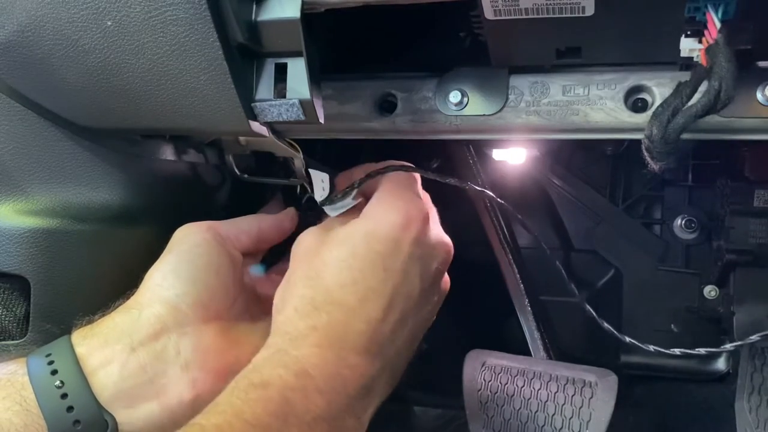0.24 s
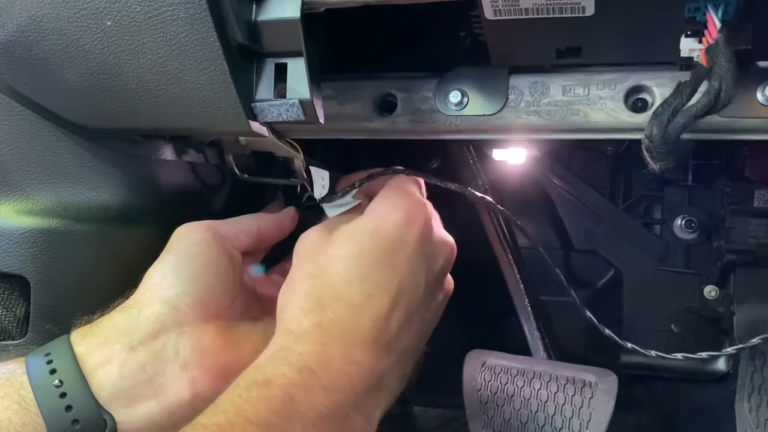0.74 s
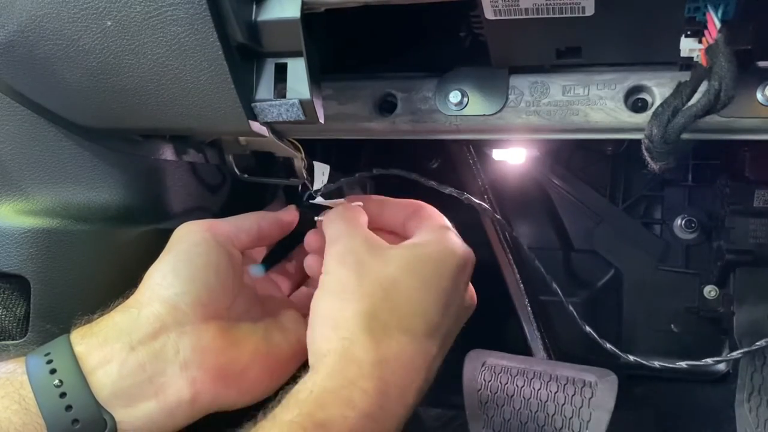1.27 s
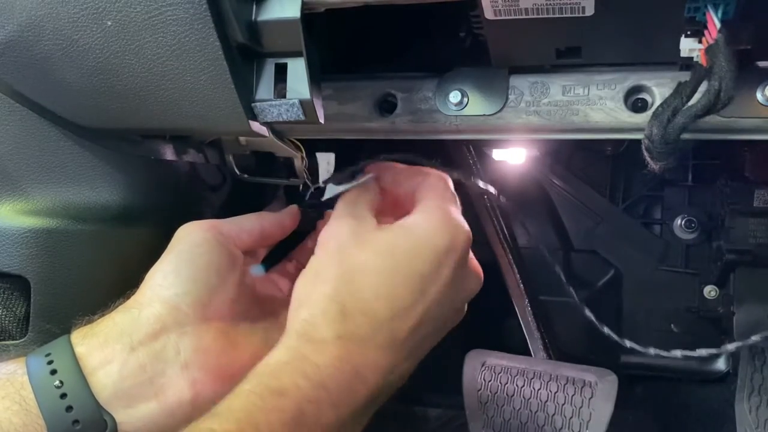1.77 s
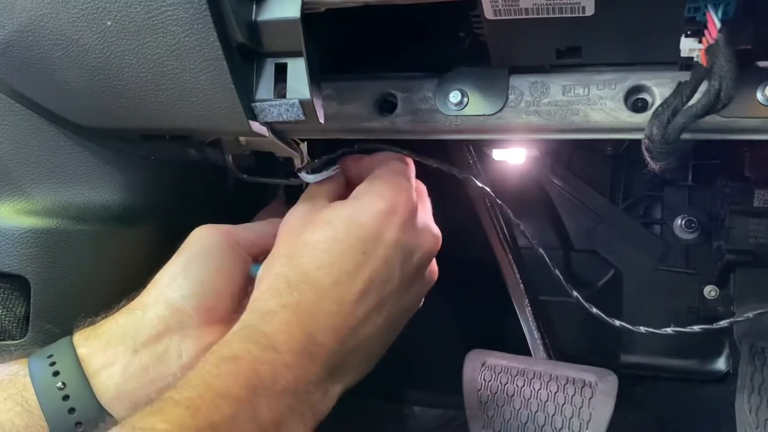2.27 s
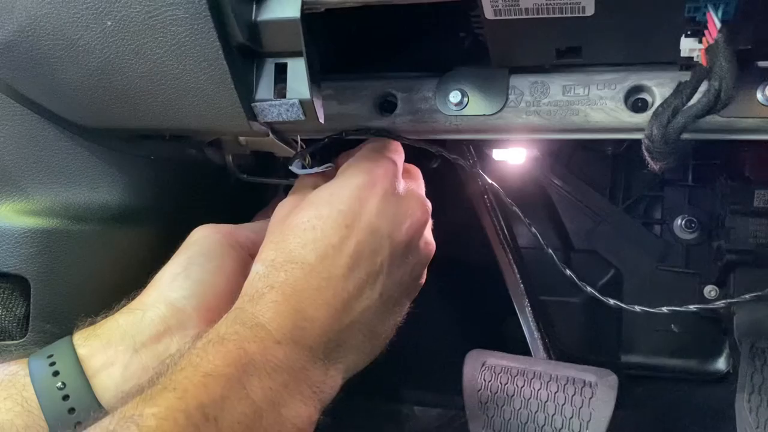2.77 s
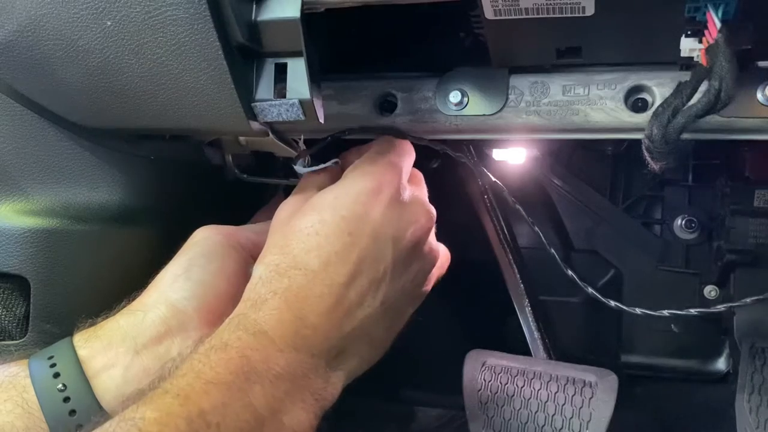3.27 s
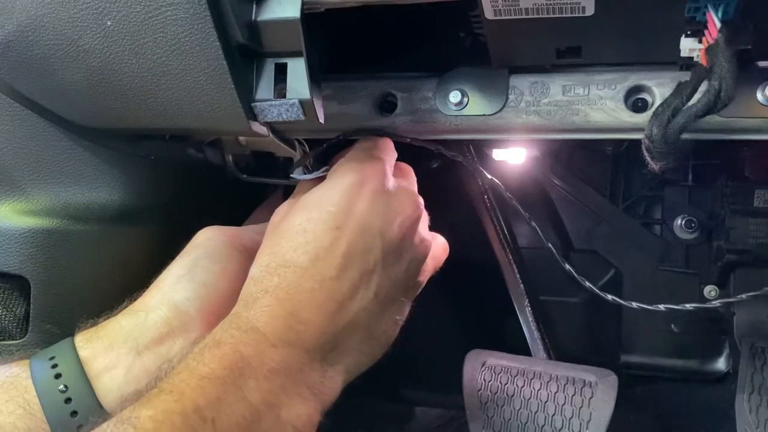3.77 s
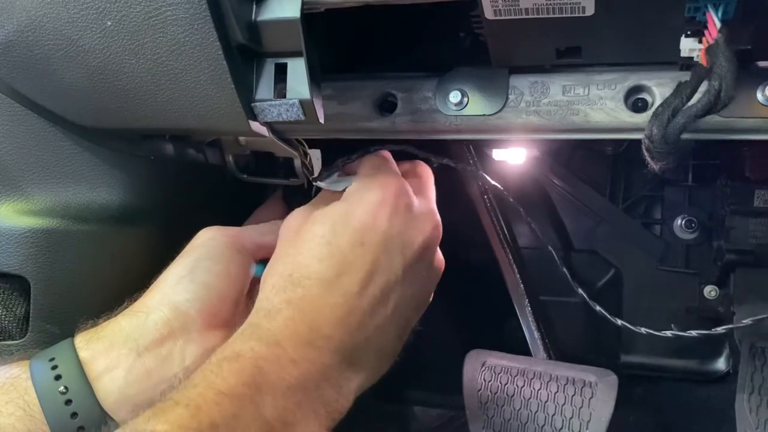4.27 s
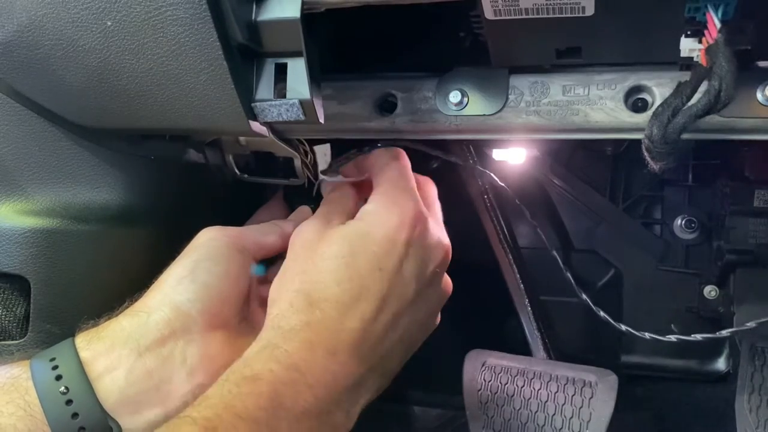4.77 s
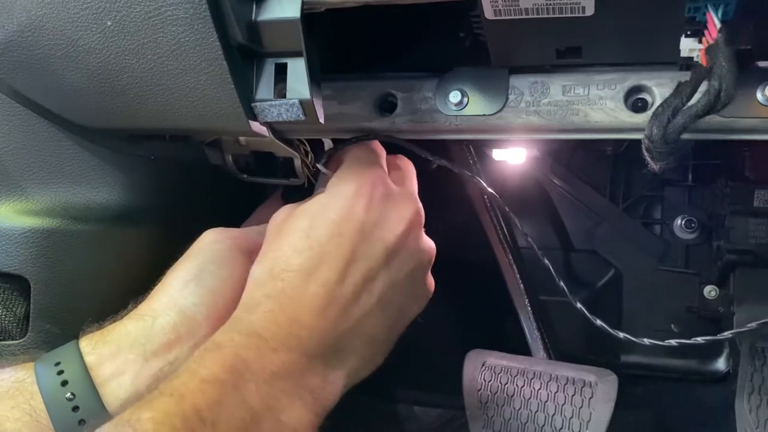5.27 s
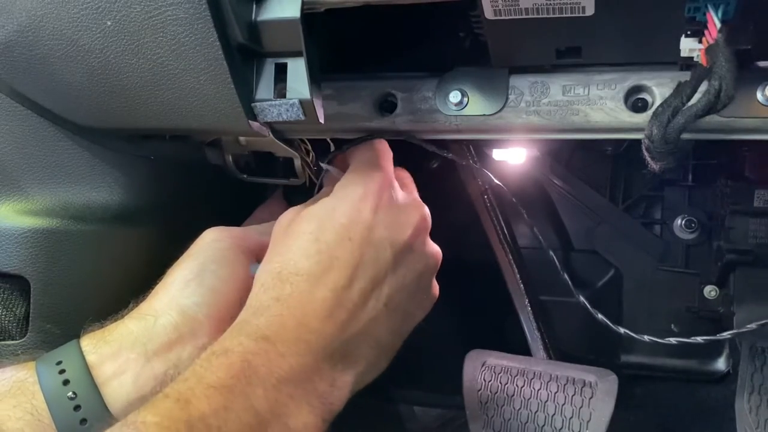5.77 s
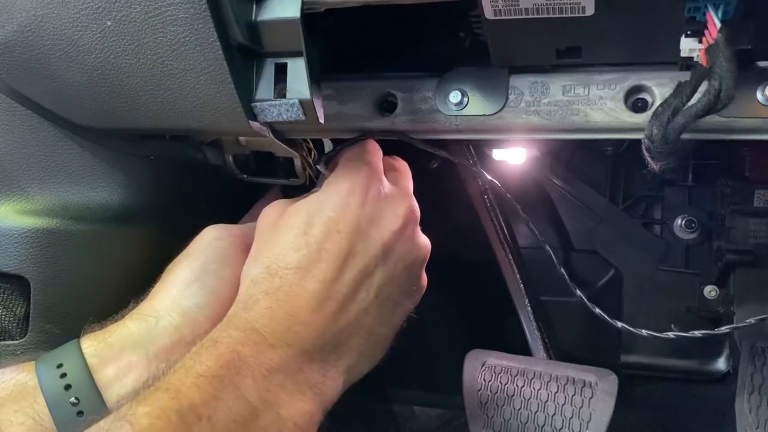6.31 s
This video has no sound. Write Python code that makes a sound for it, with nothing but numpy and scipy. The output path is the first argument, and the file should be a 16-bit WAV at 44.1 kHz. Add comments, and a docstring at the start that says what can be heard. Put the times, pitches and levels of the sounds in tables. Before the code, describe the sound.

Inside a quiet parked car, close stereo microphones catch hands working a plastic wiring connector beneath the dashboard. Soft skin rubbing and small wire scrapes mix with scattered dry clicks, some knocking dully on the trim. Activity thickens after four seconds, and near six a bright locking tab snaps loudly with a tiny chatter. A weak, wavering low hum, rumble and thin hiss lie underneath; a small bird chips faintly outside.

```python
"""Parked car, under the dashboard: close to a stereo pair, hands work a plastic wiring connector.
It clicks, its locking tab chatters and wires scrape: grainy contact forces ring edges, housing, clips and trim.
Fingers rub the insulation as shaped noise with crackle. A wavering low tone, rumble and hiss fill the cabin.
Outside, a small bird chips and faint far whistles glide: swept tones heard through dense echoes."""
import sys
import numpy as np
from scipy import signal
from scipy.fft import rfft, irfft, next_fast_len
from scipy.io import wavfile
from scipy.ndimage import uniform_filter1d, map_coordinates

SR = 44100
rng = np.random.default_rng(int(sys.argv[2]) if len(sys.argv) > 2 else 0)


def digitize_waveform(pressure):
    """Quantize a signal to 16-bit integers and store it at the path in sys.argv[1].

    Rows of a 2-D input are taken as channels; values are limited to [-1, 1].
    """
    field = np.atleast_2d(pressure).T
    bounded = np.clip(field, -1, 1)
    quanta = np.round(bounded * 32767).astype(np.int16)
    wavfile.write(sys.argv[1], SR, quanta)


N = 288414

# Levels in the tables are in dB; some sources add a gain of their own.
# steady hiss spectrum: [f/Hz, level/dB]
AIR = [(290, -19), (500, -15), (640, -1.5), (780, -2.5), (950, -4), (1300, -8.5), (2300, -10.5),
       (3000, -13), (4000, -14), (4650, -5), (5400, -8), (6300, -2), (7050, 2.5), (7700, -14.5),
       (8500, -35), (9800, -16), (12000, -33.5), (14100, -28.5), (16000, -44)]
# left-right likeness of the diffuse sounds: [f/Hz, correlation]
AIR_ALIKE = [(60, 0.95), (125, 0.88), (250, 0.76), (600, 0), (2000, 0.14), (7000, 0.19)]
# cabin rumble spectrum: [f/Hz, level/dB]
RUMBLE = [(15, -26.5), (28, -17.5), (45, -7), (59, 4), (69, 0.5), (90, -1.5), (106, 3), (125, -2),
          (150, -17), (250, -21.5), (450, -30.5), (900, -48), (2000, -63.5)]
# course of the hum: [t/s, level/dB]
HUM = [(0.0, -40), (0.05, -46), (0.73, -44.5), (1.15, -72.5), (1.2, -55.5), (2.07, -46), (2.13, -49),
       (3.13, -49.5), (3.3, -65), (4.02, -43.5), (4.77, -49), (4.83, -59), (5.14, -46), (5.19, -55.5),
       (5.3, -48), (5.45, -59), (5.59, -47.5), (5.68, -55.5), (5.74, -47.5), (5.85, -53.5), (6.28, -45),
       (6.54, -46)]
# bird chips: [t/s, level/dB, base pitch f/Hz]
CHIPS = [(0.176, -62, 6460), (.239, -52.5, 6680), (1.583, -57, 6860), (2.687, -52.5, 6480),
         (4.873, -51.5, 6800), (5.134, -68, 6780), (5.406, -67, 6850), (5.762, -67, 6830),
         (6.182, -69.5, 6550)]
# faint far whistles: [t/s, length/s, start f/Hz, end f/Hz, level/dB]
WHISTLES = [(1.333, .05, 2440, 2170, -73.5), (2.223, 0.062, 3270, 2570, -79),
            (2.787, 0.15, 3570, 3610, -78.5), (2.822, 0.081, 4670, 4760, -83),
            (2.853, .057, 3250, 2710, -83.5), (2.955, 0.063, 3730, 4280, -83.5),
            (2.998, .067, 2230, 2510, -87)]
# fingers rubbing along the insulation: [start t/s, length/s, skin level/dB, crackle level/dB]
RUBS = [(-.06, 0.39, -79, -102), (0.32, 0.44, -83.5, -100), (1.833, 0.22, -86.5, -83),
        (2.896, 0.3, -103, -96), (3.657, .6, -98, -99), (4.472, 0.17, -75.5, -72.5),
        (4.678, 0.51, -89.5, -95.5), (5.204, 0.24, -80.5, -100), (5.408, 0.26, -77, -75),
        (5.65, 0.34, -79, -95), (5.962, 0.64, -80, -101.5)]
# skin on insulation, spectrum: [f/Hz, level/dB]
SKIN = [(200, -5.5), (400, -3), (750, -5.5), (1000, -2), (1200, -1.5), (1520, 1.5), (1900, -10.5),
        (2300, -7), (3000, -17), (8000, -35.5)]
# air resonances of the footwell: [f/Hz, width/Hz, level/dB]
CABIN = [(150.6, 26, -1.5), (237.7, 32, 5.5), (352, 64, -2.5)]
# resonances of the dashboard trim: [f/Hz, width/Hz, level/dB]
TRIM = [(474, 90, -27.5), (658, 143, 8), (840, 49, 9), (989, 186, 11.5), (1315, 140, -27.5),
        (1420, 170, -22.5), (1903, 380, -7)]
# resonances of the wire clips: [f/Hz, width/Hz, level/dB]
CLACK = [(1527, 1800, -11.5), (2310, 130, 1.5), (2650, 510, -13.5), (3410, 1100, -7.5)]
# connector housing, spectrum: [f/Hz, level/dB]
SHELL = [(1500, -32), (3300, -18.5), (4000, -5.5), (4600, 0), (5150, -3), (5700, -0.5), (6200, 0.5),
         (7000, 0.5), (8000, -6), (9500, -31.5)]
# resonances of the housing's thin edges: [f/Hz, width/Hz, level/dB]
SNAP = [(9350, 510, 0), (10460, 140, -3), (10150, 440, -1.5), (11900, 900, -12.5), (12700, 100, -10.5),
        (13850, 340, -14.5), (13100, 240, -2.5), (15300, 750, -1), (14100, 160, -4.5)]
# short slides of wire and fingers:
# [t/s, plastic level/dB, brightness/dB, trim knock level/dB, knock tilt/(dB per octave), early t60/s]
SCRAPES = [(1.0078, -88, 9, -77, -1, 0.039), (2.266, -84.5, -6, -77.5, 3, 0.048),
           (2.9554, -73.5, 12.5, -73, -3, 0.038), (3.1185, -75, 6.5, -76.5, -7, .07),
           (3.3174, -80.5, 16, -70, 5, 0.035), (4.5328, -68, 14, -69, -2, 0.096),
           (4.7225, -79, -1, -65, -7, 0.085), (4.8635, -89, 24, -72, 2, .07),
           (4.9947, -87, -4, -76.5, 6, 0.07), (5.0904, -64.5, 7.5, -65, 3, .17),
           (5.3024, -78.5, -5, -84, 13, 0.05), (5.3204, -78.5, -12, -75.5, 13, 0.033),
           (5.65, -72, 2, -65.5, -5, .14), (5.7634, -75, 7, -75.5, 0, 0.12),
           (6.4076, -78.5, 4.5, -77.5, -2, 0.45), (6.5046, -59.5, 9, -55, -4.5, 0.31),
           (6.5324, -63, 1, -59.5, -9.5, 0.061)]
# sharp contacts of the connector, same columns:
# [t/s, plastic level/dB, brightness/dB, trim knock level/dB, knock tilt/(dB per octave), early t60/s]
CLICKS = [(1.731, -66, 19.5, -87, 0, 0.027), (2.029, -60.5, 8.5, -60.5, 10, .034),
          (3.07, -71.5, 11, -67, -5, 0.081), (3.18, -78.5, 24, -68.5, 4.5, .07),
          (3.548, -61.5, 20.5, -48, -3.5, .06), (3.8478, -64.5, 34.5, -79, 2, 0.025),
          (4.3175, -63.5, 22.5, -54, 3, 0.03), (4.326, -59.5, 15.5, -60.5, 3.5, 0.07),
          (4.615, -83.5, 25, -68.5, -5, 0.063), (4.703, -80, -19.5, -64.5, -6, 0.061),
          (5.0744, -66.5, 35, -57.5, 3.5, 0.069), (5.1303, -58.5, -1.5, -67.5, 8, 0.023),
          (5.469, -61.5, 0.5, -65.5, -3, 0.014), (5.5445, -63, 5, -62.5, 0, 0.069),
          (5.9545, -47, 19, -57.5, 0, 0.073), (6.099, -83.5, -8, -77, 16, .02)]
# the locking tab jumps its catch and chatters: [t/s, level/dB]
LOCK = [(5.9552, -27.5), (5.9568, -31), (5.9584, -35)]
# modes of the tab: [f/Hz, level/dB, t60/s]
TAB = [(4626, -12, .035), (5170, -15, .03), (5660, -15, .028), (6170, -12, .032), (9540, -6, .026),
       (10210, -6, .026), (10900, -11, .02), (12690, -8, .02), (12950, -4, .024), (13340, -4, .022),
       (13600, 1, .026), (13970, -3, .026), (14180, -4, .024), (14535, -5, .024), (15000, -13, .024)]

TOP_HZ = 15900  # upper band limit of the recorder
HUM_HZ, DRIFT_HZ, DRIFT_PER_S = 108.03, 1.192, 6  # the hum wanders about one pitch
FULL_DB, SAG_HZ_PER_DB = -45, 0.25  # its pitch is lower when it falls below full level
FLUTTER_DB, FLUTTER_PER_S = 1.88, 23
# level and late echo of a near chip; fainter ones are farther and echo more (dB per dB)
NEAR_DB, NEAR_ECHO_DB, ECHO_SLOPE = -52, -18, 1.4
OVERTONE_DB, DULLING = -15, 0.7  # octave of a near chip; distance dulls it (dB per dB)
RUB_ATTACK_S, RUB_RELEASE_S = 0.0418, 0.15
HOLD_SKIN_DB, HOLD_CRACKLE_DB = -94, -104  # fingers that merely hold the wires
# a brighter contact rings the thin edges more and the wire clips less (dB per dB)
SNAP_SLOPE, CLACK_SLOPE = 0.54, 0.64


def amp(db):
    """Decibels to gain."""
    return 10 ** (np.asarray(db) / 20)


def unit(x):
    """Scale to rms 1."""
    return x / np.sqrt(np.mean(x ** 2) + 1e-20)


def along(points, hz):
    """Read (Hz, value) points on a log frequency axis."""
    f, v = np.transpose(points)
    return np.interp(np.log(hz + 1), np.log(f + 1), v)


def curves(rows):
    """One value per sample for each column after the time."""
    s, *cols = np.transpose(rows)
    return [np.interp(np.arange(N) / SR, s, c) for c in cols]


def wobble(rate, n):
    """A smooth random curve of n samples, rate knots a second."""
    knots = rng.standard_normal(int(n * rate / SR) + 4)
    return map_coordinates(knots, [np.arange(n) * rate / SR])


def filtered(x, response):
    """Apply a complex response of frequency to x."""
    n = x.shape[-1]
    m = next_fast_len(n + 8192)
    return irfft(rfft(x, m) * response(np.fft.rfftfreq(m, 1 / SR)), m)[..., :n]


def colour(points):
    """Response of a (Hz, dB) spectrum."""
    return lambda f: amp(along(points, f))


def body(modes):
    """Causal response of a set of resonances, alternating in sign."""
    def response(f):
        total = 0
        for k, (centre, width, db) in enumerate(modes):
            damping = 1j * f * width
            total = total + (-1) ** k * amp(db) * damping / (centre * centre - f * f + damping)
        return total
    return response


def add(track, s, x):
    """Mix x into the track at time s."""
    i = max(round(s * SR), 0)
    track[..., i:i + x.shape[-1]] += x[..., :max(N - i, 0)]


def loudest(x, size):
    """Highest short-term rms over size samples, all channels together."""
    return np.sqrt(uniform_filter1d(np.mean(x ** 2, axis=0), size=size).max())


def ports(x, lead_ms, pan_db):
    """A near source reaches the left microphone earlier and louder; negative values favour the right."""
    side = np.array([[.5], [-.5]])
    return filtered(x, lambda f: amp(side * pan_db) * np.exp(2j * np.pi * f * side * lead_ms * 10 ** -3))


def diffuse(spectrum):
    """Stereo noise of rms 1, alike in the bass and nearly unrelated in the treble."""
    def mid_side(f):
        turn = np.arccos(np.clip(along(AIR_ALIKE, f), -1, 1)) / 2
        return colour(spectrum)(f) * np.array([np.cos(turn), np.sin(turn)])
    mid, side = filtered(rng.standard_normal((2, N)), mid_side)
    return unit(np.array([mid + side, mid - side]))


def hiss():
    """Steady thin air noise, spread across both microphones."""
    return amp(-78.5) * diffuse(AIR)


def hum():
    """A low tone swells, sags and flutters in the cabin; the rumble follows a quarter of its level in dB."""
    db, = curves(HUM)
    hz = HUM_HZ + SAG_HZ_PER_DB * (db - FULL_DB) + DRIFT_HZ * wobble(DRIFT_PER_S, N)
    flutter_db = FLUTTER_DB * wobble(FLUTTER_PER_S, N)
    tone = amp(db + flutter_db - 0.18) * unit(np.sin(2 * np.pi * np.cumsum(hz) / SR))
    rumble = amp(-58.0 + 0.25 * (db - db.mean())) * diffuse(RUMBLE)
    return (tone + rumble) * amp([[.25], [-.25]])  # slightly left


def hall(x, t60, late_db):
    """A far call arrives as dense echoes, different at each microphone; its loudest moment has rms 1."""
    t = np.arange(SR) / SR
    decay = amp(-60 * t / t60) + amp(late_db - 60 * t / 1.1)
    tail = rng.standard_normal((2, SR)) * decay
    wet = signal.fftconvolve(x[None], tail, axes=1)
    return wet / loudest(wet, 1024)


def whistles():
    """Far whistles glide and quaver, each with a weaker octave."""
    out = np.zeros((2, N))
    for s, length, start_hz, end_hz, db in WHISTLES:
        n = round(length * SR)
        glide = np.linspace(start_hz, end_hz, n) * (1 + 0.016 * wobble(200, n))
        phase = 2 * np.pi * np.cumsum(glide) / SR
        note = np.hanning(n) * (np.sin(phase) + amp(-9.0) * np.sin(2 * phase))
        add(out, s, amp(db) * hall(note, t60=.12, late_db=-20.5))
    return out


def chips():
    """Each bird chip flicks up and down in pitch with a fast flutter and a weak octave."""
    out = np.zeros((2, N))
    u = np.linspace(0, 1, round(.036 * SR))
    contour = np.interp(u, [0, .2, .45, .7, 1], [.82, 1.0, 1.07, 1.02, .81])
    swell = np.abs(np.sin(np.pi * u)) ** 0.56
    for s, db, hz in CHIPS:
        late_db = NEAR_ECHO_DB + ECHO_SLOPE * (NEAR_DB - db)
        flutter = 1 + .03 * wobble(500, len(u))
        phase = 2 * np.pi * np.cumsum(hz * contour * flutter) / SR
        octave_db = db + OVERTONE_DB + DULLING * (db - NEAR_DB)
        add(out, s, amp(db) * hall(swell * np.sin(phase), t60=.25, late_db=late_db))
        # the air swallows the echoes of the octave sooner
        add(out, s, amp(octave_db) * hall(swell ** 4 * np.sin(2 * phase), t60=.22, late_db=-40))
    return out


def rubbing():
    """Skin brushes the wires softly and unevenly while sparse random slips crackle in the insulation."""
    t = np.arange(N) / SR
    skin_gain, crackle_gain = amp(HOLD_SKIN_DB), amp(HOLD_CRACKLE_DB)
    for s, length, skin_db, crackle_db in RUBS:
        stroke = np.clip(np.minimum((t - s) / RUB_ATTACK_S, (s + length - t) / RUB_RELEASE_S), 0, 1)
        skin_gain = skin_gain + amp(skin_db) * stroke
        crackle_gain = crackle_gain + amp(crackle_db) * stroke
    happens = rng.random(N) < 2000 / SR  # about 2000 slips a second
    strength = amp(2.7 * rng.exponential(size=N).clip(0, 4))
    slips = happens * strength * rng.standard_normal((2, N))
    crackle = amp(-6.5) * crackle_gain * unit(filtered(slips, body(SNAP)))
    skin = skin_gain * diffuse(SKIN) * amp([[1], [-1]])  # a little to the left
    pressure = amp(2.4 * wobble(25, N))
    return pressure * (crackle + skin)


def ring(force, response, db, spread, blow=0):
    """A clean blow and a grainy force ring a part; nearby surfaces scatter it. db is its loudest moment."""
    grit = rng.standard_normal((3, len(force)))  # one shared grain, one for each side
    drive = force * (grit[0] + spread * grit[1:]) / np.linalg.norm(force)
    drive[:, 0] += blow
    x = filtered(drive, response)
    return amp(db) * x / loudest(x, 128)


def edges(f):
    """Thin edges ring high and lose their bass."""
    return body(SNAP)(f) * (1j * f / (5000 + 1j * f)) ** 2


def panel(f):
    """The trim resonates and loses its treble."""
    return body(TRIM)(f) / (1 + 1j * f / 2500) ** 2


def footwell(f):
    """The air behind the trim resonates low and loses its treble."""
    return body(CABIN)(f) / (1 + 1j * f / 500) ** 2


def contacts(rows, rise, blow, tail_db, slip_db, snap_db, shell_db, clack_db, knock_db, boom_db):
    """Each contact sounds edges and housing and, through the wires, the trim, which drives the air behind it."""
    snaps, plastic, trim, boom = np.zeros((4, 2, N))
    t = np.arange(SR // 5) / SR
    for s, level, bright, knock, tilt, t60 in rows:
        # each spot on the trim favours other modes
        spot = lambda f: panel(f) * amp(tilt * np.log2(np.clip(f, 400, 1600) / 800))
        # the force may slip unevenly as it dies; the footwell adds a short tail, longer in the bass
        push = (1 - np.exp(-t / rise)) * amp(slip_db * wobble(300, len(t)))
        force = push * (amp(-60 * t / t60) + amp(tail_db - 60 * t / 0.14))
        thud = push * (amp(-60 * t / (1.02 * t60)) + amp(-13.5 - 60 * t / 0.19))
        # the fingers detune the clips a little each time
        grip = 1 + .035 * rng.standard_normal()
        clips = lambda f: body(CLACK)(f * grip)
        add(snaps, s, ring(force, edges, level + SNAP_SLOPE * bright + snap_db, spread=0.23))
        add(plastic, s, ring(force, colour(SHELL), level + shell_db, spread=1.0))
        add(plastic, s, ring(thud, clips, level - CLACK_SLOPE * bright + clack_db, spread=0.057))
        add(trim, s, ring(thud, spot, knock + knock_db, spread=0.49, blow=blow))
        # the air answers 12.1 ms later
        add(boom, s + 0.0121, ring(thud, footwell, knock + boom_db, spread=0.8, blow=blow))
    near_edges = ports(snaps, lead_ms=-0.293, pan_db=-0.1)
    near_plastic = ports(plastic, lead_ms=0.062, pan_db=4.0)
    near_trim = ports(trim, lead_ms=0.26, pan_db=6.0)
    return near_edges + near_plastic + near_trim + boom


def scrapes():
    """Wire and fingers slide: a softer onset and a grainy, dying force."""
    return contacts(SCRAPES, rise=0.002, blow=0.56, tail_db=-22, slip_db=0.0,
                    snap_db=-5.0, shell_db=3.5, clack_db=2.5, knock_db=3.5, boom_db=8.5)


def clicks():
    """Plastic edges snap past each other: a quick onset, a harder blow and an uneven force."""
    return contacts(CLICKS, rise=0.00072, blow=0.78, tail_db=-18, slip_db=3,
                    snap_db=-5.0, shell_db=3.5, clack_db=0.0, knock_db=2.5, boom_db=5.5)


def lock():
    """Each stroke of the locking tab rings its modes anew, over a brief crack."""
    out = np.zeros((2, N))
    t = np.arange(SR // 16) / SR
    hz, level, t60 = np.transpose(TAB)[..., None]
    for s, db in LOCK:
        strength = amp(level + rng.normal(0, 2.7, hz.shape) - 60 * t / t60)
        start = rng.random(hz.shape)  # phase in turns
        modes = np.sum(strength * np.sin(2 * np.pi * (hz * t + start)), axis=0)
        grain = unit(filtered(rng.standard_normal((2, len(t))), body(SNAP)))
        crack = amp(6.5 - 60 * t / 0.0041) * grain
        stroke = (modes + crack) * (1 - np.exp(-t / 0.00025))
        add(out, s, amp(db) * stroke / loudest(stroke[:1], 64))  # level set by the left channel
    return ports(out, lead_ms=0.063, pan_db=0)


def scene():
    """Hiss and hum all round, whistles and bird outside, hands close to the microphones."""
    background = hiss() + hum()
    outside = whistles() + chips()
    hands = rubbing() + scrapes() + clicks() + lock()
    return background + outside + hands


def record(dry):
    """The recorder keeps nothing at or above its band limit."""
    return filtered(dry, lambda f: f < TOP_HZ)


dry = scene()
out = record(dry)
digitize_waveform(out)
```